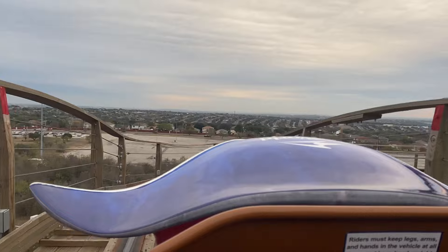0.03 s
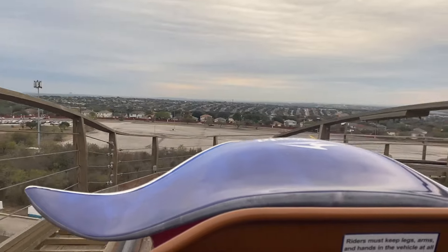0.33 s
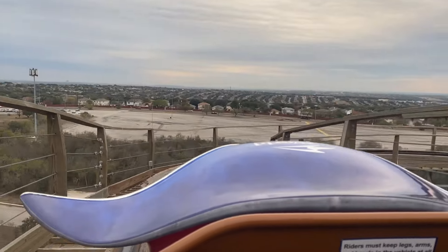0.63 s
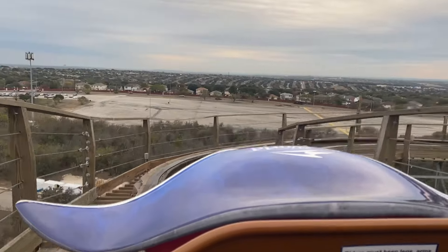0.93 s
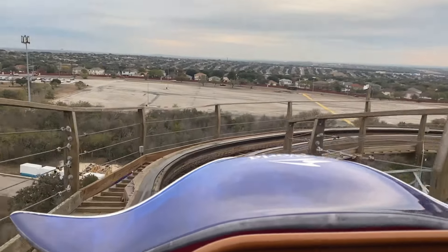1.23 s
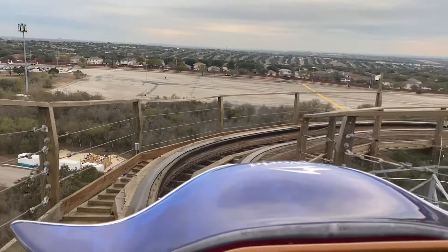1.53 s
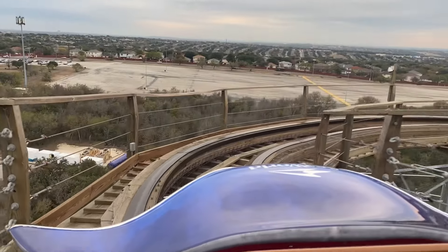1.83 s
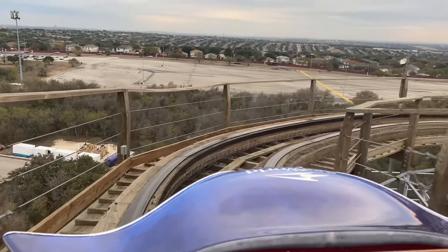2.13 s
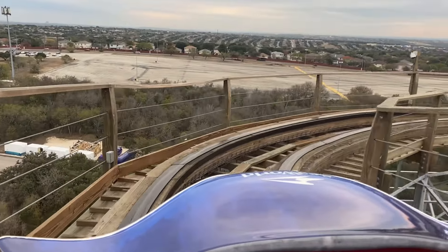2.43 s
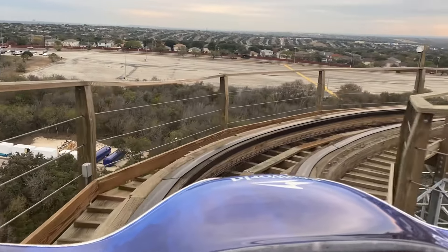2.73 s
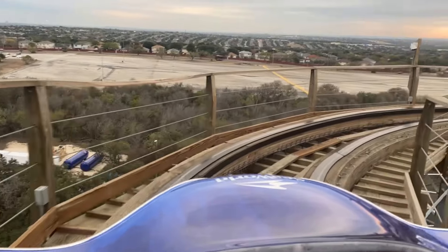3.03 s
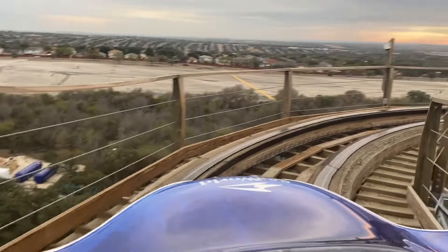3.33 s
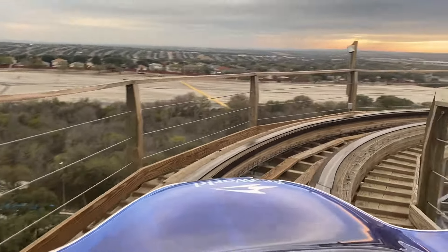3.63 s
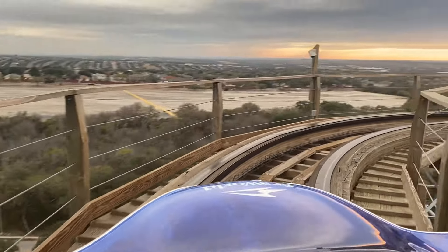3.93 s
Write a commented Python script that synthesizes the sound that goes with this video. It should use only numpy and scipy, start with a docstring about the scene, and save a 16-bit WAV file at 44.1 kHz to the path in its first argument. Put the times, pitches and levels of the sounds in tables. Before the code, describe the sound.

A roller coaster train rolls on a wooden track, heard from the front seat, with a low rumble of wheels and wind, thumps and ringing steel clacks. Ratchet ticks, sparse at first, run rapidly from about 1 second and grow heavier as a chain rattles in around 1.7 seconds. By 2.7 seconds clacks, chain and ratchet die away. The car jolts onward, with one last tick near 3.8 seconds.

```python
"""A roller coaster train rolls off the top of its lift into a wooden curve, heard from the front seat.
From the start, wheels and wind rumble, the track roars, the car body thumps and steel parts clack and ring.
Ratchet ticks, sparse at first, run at about 23 a second from 1 s and grow heavier as a chain rattles in.
By 2.7 s clacks, chain and ratchet die away and the car jolts over the track; one last tick falls at 3.8 s."""
import sys
import numpy as np
from scipy import signal
from scipy.fft import rfft, irfft
from scipy.io import wavfile

SR = 44100
rng = np.random.default_rng(int(sys.argv[2]) if len(sys.argv) > 2 else 0)


def master(y):
    """Save y as 16-bit WAV."""
    cut = np.clip(np.atleast_2d(y).T, -1, 1)
    pcm = np.round(cut * 32767)  # scale
    wavfile.write(sys.argv[1], SR, pcm.astype(np.int16))


N = 176400
TIME_S = np.arange(N) / SR

# Table levels are relative; each source adds its own gain.
# stereo image: f/Hz, left-right likeness (clipped in use)
LIKENESS = [(60, -1), (130, 1.37), (260, 0.15), (500, 0.6), (1000, 0.16), (2000, 0.12), (3200, 0.47),
            (6500, 0.58), (8000, 1.04), (8700, -2.1), (9500, -1.02), (10200, 0.1), (12000, 3.5),
            (12900, -9), (14000, -0.3), (15000, -0.9)]
# stereo balance: f/Hz, left minus right/dB
BALANCE = [(60, 2), (170, -1), (400, 1.5), (950, 3.5), (1500, 1), (2400, 0.5), (4300, 4), (6500, 0),
           (12000, 0)]
# envelopes: t/s, level/dB
RUMBLE_LEVEL = [(0.0, -21.5), (0.26, -19.5), (0.28, -15), (0.34, -21), (0.75, -17.5), (0.77, -22.5),
                (1.19, -18), (1.24, -24.5), (1.53, -19), (2.84, -26), (2.9, -20.5), (3.0, -20),
                (3.05, -20.5), (3.13, -21.5), (3.49, -22.5), (3.55, -15), (3.63, -23), (3.81, -21.5),
                (3.84, -18.5), (3.92, -18), (4.0, -21)]
ROAR_LEVEL = [(0, -38), (.5, -34), (.66, -23.5), (.9, -34.5), (1.25, -29), (1.6, -27), (1.95, -31),
              (2.28, -30), (2.55, -36), (2.85, -46), (3.1, -38.5), (4, -39)]
GRIND_LEVEL = [(0.0, -34), (0.43, -32), (1.16, -33.5), (1.58, -29.5), (2.25, -38.5), (2.41, -35.5),
               (2.61, -34), (2.74, -38), (3.01, -34.5), (3.31, -35.5), (4.0, -34)]
HISS_LEVEL = [(0.0, -50), (0.21, -48.5), (0.71, -40), (0.95, -46), (1.44, -45), (1.79, -37), (2.36, -51),
              (2.54, -49), (2.66, -50.5), (3.31, -49), (3.55, -50), (4.0, -46.5)]
CHAIN_LEVEL = [(1.1, -54), (1.35, -50), (1.52, -43), (1.75, -33), (1.85, -36), (1.95, -49), (2.15, -45),
               (2.36, -29.5), (2.5, -62)]
# noise spectra: f/Hz, level/dB
RUMBLE_SPECTRUM = [(13, -45), (22, -36), (59, 0.5), (118, -4), (174, -2.5), (225, 2), (313, -5.5),
                   (354, -6), (469, -11), (548, -11.5), (771, -21), (900, -19), (1170, -48), (1980, -120)]
GRIND_SPECTRUM = [(400, 4), (750, 6), (1300, 1), (1800, -7.5), (2800, -10.5), (4500, -22.5), (6500, -37),
                  (16000, -26)]
HISS_SPECTRUM = [(2500, -2), (4500, 4.5), (6500, 3), (8500, -11), (11500, -12.5), (13000, -25),
                 (16000, -22)]
JOLT_SPECTRUM = [(40, -12), (120, 7), (400, 11), (700, 11.5), (1200, 4.5), (2200, -2.5), (4000, -10),
                 (6500, -21), (11000, -29), (16000, -34)]
CHAIN_SPECTRUM = [(600, -5), (1200, 13), (1800, 1), (2700, 2.5), (3600, -7), (4600, -10), (6000, -15),
                  (12000, -45)]
CLACK_SPECTRUM = [(900, -13), (1500, -2), (2200, 4.5), (2900, 4), (3500, -3.5), (4300, -7.5), (5000, -18.5),
                  (6300, -12.5), (8000, -25.5), (12000, -26), (16000, -35)]
KNOCK_SPECTRUM = [(120, -18.5), (350, 9), (550, 11), (750, 0.5), (1000, 2), (1400, -1.5), (2000, -6.5),
                  (4000, -19), (9000, -36.5)]
SNAP_SPECTRUM = [(1500, -32), (2800, -26), (4000, -1.5), (5000, 0.5), (6100, 6), (7200, 1), (9000, -19),
                 (16000, -46)]
TOP_SPECTRUM = [(6000, -12.5), (8500, -5), (11000, 4), (12800, -2.5), (14500, -2.5), (16000, 2)]
CLUNK_SPECTRUM = [(800, -5), (1800, 5), (2900, 7), (4100, 1), (5200, 0.5), (7000, -21), (16000, -47)]
# resonances: f/Hz, level/dB, t60/s
DRONE_MODES = [(165, -2.5, 0.042), (352.8, -2.5, 0.24), (652.7, -9.5, 0.14)]
TRACK_MODES = [(378, 3, 0.054), (461, -1.5, 0.015), (650, -4, 0.086), (840, -7, 0.023)]
WHEEL_MODES = [(1247, -6, 0.14), (1485, -27, 0.21), (2056, -8, 0.014), (2425, -15, 0.064), (3020, -17, .07),
               (6030, -23, 0.056)]
CAR_MODES = [(85.3, -14.5, 0.2), (136, -6.5, 0.11), (175, 0.5, 0.11), (213.6, -5, 0.11), (296, -21, 0.04),
             (356, -6.5, 0.099), (484, -12, 0.031), (690, -16, 0.035), (1100, -19, 0.025)]
STEEL_MODES = [(1068, -6, 0.19), (1390, -7, 0.057), (1640, -11, 0.052), (1964, -12, 0.07),
               (2228, -11.5, 0.052), (2460, -13, 0.078), (2842, -10.5, 0.064), (3124, -10.5, 0.056),
               (3723, -12, 0.04), (4230, -21.5, 0.04)]
# pawl resonances: ratio to pawl pitch, level/dB, t60/s
PAWL_MODES = [(.82, -5, .008), (1, -2, .011), (1.17, -5, .008), (1.93, -4, .01)]
# blows to the car body: t/s, level/dB
THUMPS = [(0.061, -5), (0.270, -3), (0.509, -3), (0.726, -3), (0.801, -11.5), (0.935, -9.5), (1.072, -11),
          (1.167, -12.5), (1.605, -15), (1.714, -28), (2.112, -14), (2.206, -5.5), (2.922, -3),
          (3.029, -5.5), (3.053, -7), (3.545, -8.5), (3.566, -10), (3.836, 3), (3.871, -4)]
# jolts on the track: t/s, level/dB, hold/s, t60/s
JOLTS = [(2.766, -25, 0.021, 0.045), (2.872, -23, 0.051, 0.29), (2.935, -26, 0.023, 0.34),
         (3.014, -21, 0.0095, 0.31), (3.395, -26, 0.013, 0.26), (3.526, -20, 0.029, 0.21),
         (3.706, -25.5, 0.031, 0.14), (3.821, -18, 0.028, 0.19), (3.903, -26, .017, 0.14)]
# hollow notes of the running gear: t/s, level/dB, f/Hz
TOCKS = [(0.063, -24, 710), (.120, -28, 990), (.426, -24.5, 1150), (0.747, -22.5, 710), (0.858, -22, 630),
         (1.212, -22, 644), (1.302, -23, 637), (2.772, -27.5, 760)]
# steel clacks under the cars: t/s, ring level/dB, knock level/dB, chatter/s
CLACKS = [(0.0004, -26, -18, 0.0041), (0.0507, -32, -21.5, 0.0042), (0.142, -25, -25, 0.022),
          (0.2317, -18, -29.5, 0.025), (0.4516, -21.5, -21.5, 0.019), (0.507, -29, -21.5, 0.0052),
          (0.606, -23, -29, 0.015), (0.6905, -22.5, -22.5, 0.028), (0.799, -21.5, -19, 0.016),
          (0.88, -29, -46, 0.008), (0.935, -32, -27, 0.023), (0.9696, -26, -18, 0.0057),
          (1.058, -16.5, -14.5, 0.0093), (1.119, -37, -27.5, 0.042), (1.1607, -21, -18.5, 0.0077),
          (1.274, -25, -24, 0.0084), (1.3264, -22, -23, 0.0093), (1.368, -23.5, -20.5, 0.0061),
          (1.4107, -18, -20, 0.007), (1.47, -27, -22.5, 0.019), (1.5534, -16.5, -15.5, 0.0097),
          (1.616, -20.5, -21, 0.012), (1.6806, -23, -25, 0.0095), (1.708, -25, -20, 0.012),
          (1.7534, -20.5, -19.5, 0.011), (1.811, -20, -16, 0.014), (1.8794, -26, -23.5, 0.011),
          (1.9684, -24, -25, 0.011), (2.0608, -20.5, -19.5, 0.012), (2.1059, -14.5, -15.5, 0.0069),
          (2.155, -29, -23, 0.0044), (2.187, -18, -17.5, 0.0054), (2.2414, -22.5, -17, 0.012),
          (2.337, -37, -23, 0.014)]
# ratchet ticks: t/s, snap level/dB, top-octave level/dB, t60/s, pawl f/Hz
TICKS = [(0.1203, -39.5, -56, 0.044, 5600), (0.209, -36, -54, 0.15, 5600), (0.555, -44, -40.5, 0.021, 5700),
         (0.814, -31.5, -39, 0.03, 5600), (0.9014, -35, -54, 0.035, 5650), (0.944, -34, -44, 0.039, 5650),
         (0.9864, -41, -54, 0.035, 5600), (1.072, -33, -46, 0.048, 5640), (1.115, -39, -56, 0.035, 5600),
         (1.2013, -28, -45, 0.033, 6100), (1.245, -26, -38, 0.016, 7050), (1.2868, -28, -48, 0.043, 5620),
         (1.33, -27, -41, 0.038, 5780), (1.372, -27.5, -33.5, 0.038, 5350), (1.414, -25, -41, 0.039, 5130),
         (1.461, -27, -45, 0.035, 5360), (1.5006, -33, -43.5, 0.032, 5530), (1.5444, -25, -46, 0.043, 5840),
         (1.5856, -39, -48, 0.035, 5600), (1.6292, -40, -42, 0.035, 5600),
         (1.6715, -24, -37.5, 0.051, 5620), (1.714, -20, -44, 0.055, 5950),
         (1.7558, -18.5, -41, 0.09, 5300), (1.799, -27, -39, 0.05, 6500), (1.8402, -27, -41.5, 0.035, 5700),
         (1.884, -22, -35.5, 0.021, 5700), (1.925, -16.5, -40, 0.029, 5940),
         (1.97, -19.5, -36, 0.064, 6700), (2.0098, -17, -36, 0.063, 4910), (2.181, -32, -44, 0.027, 5630),
         (2.225, -29, -47, 0.03, 5260), (2.2646, -14, -35.5, 0.075, 6180), (2.3077, -28, -48, 0.05, 5500),
         (2.3504, -23.5, -49, 0.18, 4880), (2.4354, -24, -42, 0.1, 5150), (2.48, -30, -52, 0.07, 5300),
         (2.5194, -23.5, -39.5, 0.12, 4900), (2.5662, -32, -58, 0.16, 5400), (2.606, -39, -52, 0.069, 5600),
         (2.6498, -28, -44, 0.11, 5200), (2.6887, -27, -42.5, 0.15, 5700),
         (3.8232, -25.5, -40.5, 0.082, 5590)]
# weight of the ticks: t/s, clunk re snap/dB
TICK_WEIGHT = [(0, -20), (1.5, -6), (2.0, -18), (2.3, -2), (2.7, 5.5)]


def from_db(db):
    """Decibels to gain."""
    return 10 ** (np.asarray(db) / 20)


def unit_rms(x):
    """Scale to rms 1."""
    return x / np.sqrt(np.mean(x ** 2) + 1e-20)


def at_hz(points, hz):
    """Read a table on a log-frequency axis."""
    f, value = np.transpose(points)
    return np.interp(np.log(np.maximum(hz, 1)), np.log(f), value)


def envelope(rows):
    """Gain over time from rows of t/s, level/dB."""
    return from_db(np.interp(TIME_S, *np.transpose(rows)))


def drift(rate_hz):
    """Slow random movement, rms about 1."""
    step, settle = 40, 2000
    r = np.exp(-2 * np.pi * rate_hz * step / SR)
    white = rng.standard_normal(N // step + settle + 2)
    slow = signal.lfilter([1], [1, -2 * r, r * r], white)[settle:]
    return np.interp(np.arange(N) / step, np.arange(len(slow)), unit_rms(slow))


def bandpass(x, low_hz, high_hz):
    """Butterworth band-pass."""
    return signal.sosfilt(signal.butter(2, [low_hz, high_hz], "band", fs=SR, output="sos"), x)


def ring(x, hz, t60_s):
    """One mode: a unit click starts a decaying unit sine."""
    r, w = from_db(-60 / (t60_s * SR)), 2 * np.pi * hz / SR
    return signal.lfilter([0, np.sin(w)], [1, -2 * r * np.cos(w), r * r], x + 1e-18)


def resonate(x, modes):
    """Mode bank; levels are rms re a white drive."""
    return sum(from_db(db) * np.sqrt(4 * np.log(1000) / (t60_s * SR)) * ring(x, hz, t60_s)
               for hz, db, t60_s in modes)


def colour(x, spectrum):
    """Minimum-phase filter; white noise keeps its rms."""
    size = 2 * N
    gain = unit_rms(from_db(at_hz(spectrum, np.fft.rfftfreq(size, 1 / SR))))
    cepstrum = irfft(np.log(gain))
    fold = np.r_[1, np.full(N - 1, 2), 1, np.zeros(N - 1)]
    return irfft(rfft(x, size) * np.exp(rfft(cepstrum * fold)))[..., :N]


def contacts(grain_db):
    """Dense stereo contact noise of uneven grain sizes, rms 1."""
    hz = np.fft.rfftfreq(N, 1 / SR)
    sizes = from_db(grain_db * np.repeat(rng.standard_normal(N // 30 + 1), 30)[:N])
    mid, side = rfft(rng.standard_normal((2, N)) * sizes)
    alike = np.clip(at_hz(LIKENESS, hz), -.98, .98)
    alike[hz < 100] = .95  # near-mono bass
    signs = np.array([[1], [-1]])
    pair = np.sqrt(1 + alike) * mid + signs * np.sqrt(1 - alike) * side
    return unit_rms(irfft(pair * from_db(signs * at_hz(BALANCE, hz) / 2), N))


def bursts(rows, attack_s):
    """Envelopes from rows of t/s, level/dB, hold/s, t60/s, summed in power."""
    power = np.zeros(N)
    for at_s, db, hold_s, t60_s in rows:
        start = int(at_s * SR)
        t = TIME_S[:min(SR // 2, N - start)]
        fall_db = -60 * np.maximum(t - hold_s, 0) / t60_s
        power[start:start + len(t)] += (np.minimum(t / attack_s, 1) * from_db(db + fall_db)) ** 2
    return np.sqrt(power)


def rumble():
    """Low noise of wheels and wind; each half-octave swells by itself."""
    edges_hz = 20 * 2 ** np.arange(0, 6.1, .5)
    noises, out = [contacts(grain_db=1), contacts(grain_db=1)], 0
    for k, (low_hz, high_hz) in enumerate(zip(edges_hz, edges_hz[1:])):
        band_db = at_hz(RUMBLE_SPECTRUM, np.sqrt(low_hz * high_hz)) + 2.5 * drift(rate_hz=18.8)
        out = out + bandpass(noises[k % 2], low_hz, high_hz) * from_db(band_db)
    return envelope(RUMBLE_LEVEL) * unit_rms(bandpass(out, 33, 750))


def drone():
    """The rolling car rings steadily."""
    return from_db(-31.5) * unit_rms(resonate(contacts(grain_db=5.5), DRONE_MODES))


def roar():
    """The wheels drive the low resonances of the wooden track."""
    track = unit_rms(resonate(contacts(grain_db=2.5), TRACK_MODES))
    return from_db(-1.5) * envelope(ROAR_LEVEL) * track


def rolling():
    """Steel wheels grind over the rails, ringing faintly and hissing."""
    force = contacts(grain_db=.5) * envelope(GRIND_LEVEL) * from_db(-.5 + 1.3 * drift(rate_hz=20))
    hiss = contacts(grain_db=1.5) * envelope(HISS_LEVEL) * from_db(-8.5 + 5.4 * drift(rate_hz=20))
    wheels = from_db(-11.5) * resonate(force, WHEEL_MODES)
    return colour(force, GRIND_SPECTRUM) + wheels + colour(hiss, HISS_SPECTRUM)


def thumps(gain_db=-9.5):
    """Soft blows ring the car body; mode strengths vary per blow."""
    at_s, db = np.transpose(THUMPS)
    spread_db = rng.normal(0, 1.6, (len(THUMPS), len(CAR_MODES)))
    out = np.zeros(N)
    for k, (hz, mode_db, t60_s) in enumerate(CAR_MODES):
        blows = np.zeros(N)
        blows[(at_s * SR).astype(int)] = from_db(db + gain_db + mode_db + spread_db[:, k])
        out += ring(blows, hz, t60_s)
    return bandpass(out, 45, 1100)


def jolts():
    """The car knocks against the track and rattles down; the wheels ring."""
    force = from_db(-3) * bursts(JOLTS, attack_s=.005) * contacts(grain_db=1.5)
    return colour(force, JOLT_SPECTRUM) + from_db(-12) * resonate(force, WHEEL_MODES)


def tocks(hold_s=.0085, rub_t60_s=.044, ring_t60_s=.016):
    """Brief rubs in the running gear, each sounding one damped resonance."""
    grit, out = contacts(grain_db=1), 0
    for at_s, db, hz in TOCKS:
        rub = grit * bursts([(at_s, db, hold_s, rub_t60_s)], attack_s=.0038)
        out = out + resonate(rub, [(hz, 0, ring_t60_s)])
    return out


def chain(knocks_per_s=190, t60_s=.016):
    """Small links knock together at random."""
    knocks = (rng.random(N) < knocks_per_s / SR) * from_db(rng.uniform(-3, 4, N))
    decay = from_db(-60 / (t60_s * SR))
    power = signal.lfilter([1], [1, -decay ** 2], knocks ** 2 + 1e-18)
    rattle = colour(np.sqrt(power) * contacts(grain_db=1), CHAIN_SPECTRUM)
    return from_db(-2) * envelope(CHAIN_LEVEL) * unit_rms(rattle)


def clacks(attack_s=.008, blow_t60_s=.12, knock_t60_s=.15, detune=.005, spread_db=2.5):
    """Steel parts chatter briefly: a dull knock and a ring whose modes vary per blow."""
    grit, force, steel = contacts(grain_db=3), np.zeros((2, N)), np.zeros((2, N))
    scatter = rng.standard_normal((len(CLACKS), len(STEEL_MODES), 2))
    for (at_s, db, _, hold_s), draws in zip(CLACKS, scatter):
        span = slice(int(at_s * SR), int(at_s * SR) + SR // 4)
        blow = bursts([(at_s, db - 8.5, hold_s, blow_t60_s)], attack_s)[span] * grit[:, span]
        modes = [(hz * (1 + detune * pitch), mode_db + 1 + spread_db * strength, t60_s)
                 for (hz, mode_db, t60_s), (pitch, strength) in zip(STEEL_MODES, draws)]
        force[:, span] += blow
        steel[:, span] += resonate(blow, modes)
    knock_rows = [(at_s, db - .5, hold_s, knock_t60_s) for at_s, _, db, hold_s in CLACKS]
    knock = bursts(knock_rows, attack_s) * contacts(grain_db=3)
    return colour(force, CLACK_SPECTRUM) + colour(knock, KNOCK_SPECTRUM) + steel


def ratchet(attack_s=.00025, crack_t60_s=.014, tail_t60_s=.085, bounce_s=.0045):
    """Each tooth snaps the pawl, which rings at its own pitch, bounces twice and leaves a faint tail."""
    spread_db = rng.normal(0, 2.5, (len(TICKS), len(PAWL_MODES)))
    delays_s = (bounce_s * rng.uniform(.6, 1.4, (len(TICKS), 2))).cumsum(axis=1)
    losses_db = rng.uniform(-.4, 8, (len(TICKS), 2)).cumsum(axis=1)

    def snaps(levels_db, spectrum, t60_scale=1):
        grit, out = contacts(grain_db=1.5), np.zeros((2, N))
        for k, ((at_s, _, _, t60_s, hz), db) in enumerate(zip(TICKS, levels_db)):
            span = slice(int(at_s * SR), int(at_s * SR) + SR // 5)
            crack = (at_s, db + 4.5, attack_s, crack_t60_s)
            body = (at_s, db, attack_s, t60_s * t60_scale)
            tail = (at_s, db - 24, attack_s, tail_t60_s)
            bounces = [(at_s + delay_s, db - loss_db, attack_s, crack_t60_s)
                       for delay_s, loss_db in zip(delays_s[k], losses_db[k])]
            force = bursts([crack, body, tail] + bounces, attack_s)[span] * grit[:, span]
            strike = bursts([crack], attack_s)[span] * grit[:, span]
            modes = [(hz * ratio, mode_db + own_db, ring_s)
                     for (ratio, mode_db, ring_s), own_db in zip(PAWL_MODES, spread_db[k])]
            out[:, span] += force + from_db(-7) * resonate(strike, modes)
        return colour(out, spectrum)

    times_s, snap_db, top_db, _, _ = np.transpose(TICKS)
    weight_db = np.interp(times_s, *np.transpose(TICK_WEIGHT))
    snap = snaps(snap_db - 13.5, SNAP_SPECTRUM)
    top = snaps(top_db + 5, TOP_SPECTRUM, t60_scale=.82)
    clunk = snaps(snap_db - 13.5 + weight_db, CLUNK_SPECTRUM)
    return snap + top + clunk


def scene():
    """Stereo sum at the front seat."""
    mechanism = ratchet() + clacks() + chain() + tocks()
    return mechanism + jolts() + thumps() + rumble() + drone() + roar() + rolling()


def record(dry):
    """Low cut at 32 Hz; stopband from 16.8 kHz."""
    dry = signal.sosfilt(signal.butter(2, 32, "high", fs=SR, output="sos"), dry)
    return signal.sosfilt(signal.cheby2(14, 60, 16800, fs=SR, output="sos"), dry)


dry = scene()
out = record(dry)
master(out)
```